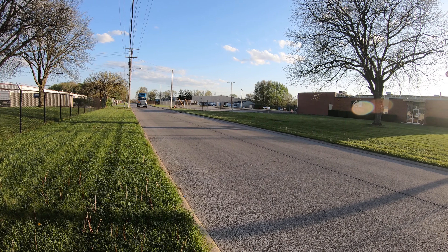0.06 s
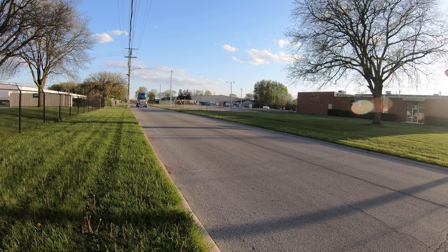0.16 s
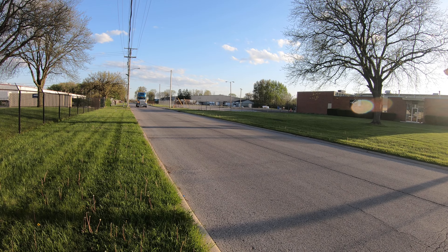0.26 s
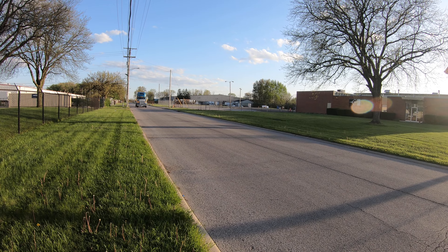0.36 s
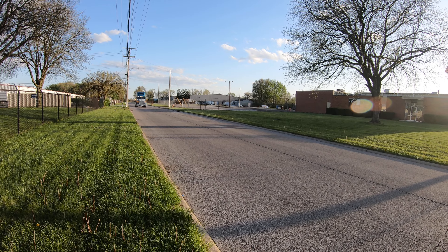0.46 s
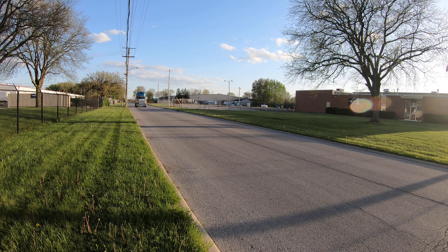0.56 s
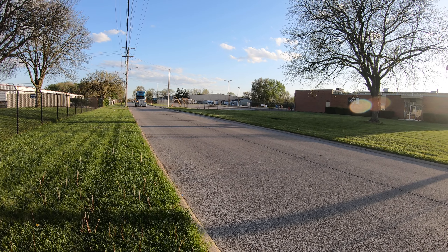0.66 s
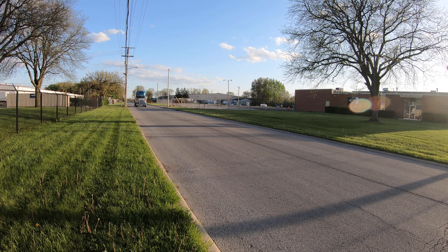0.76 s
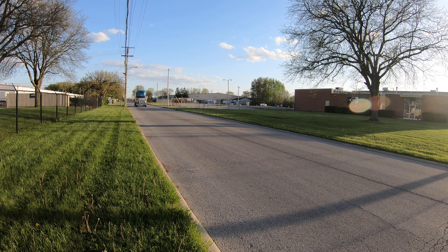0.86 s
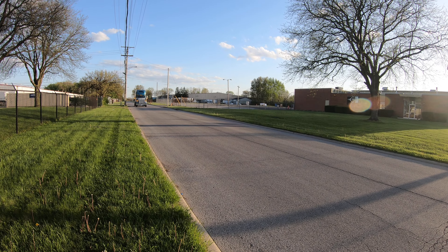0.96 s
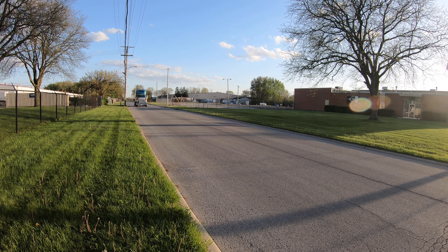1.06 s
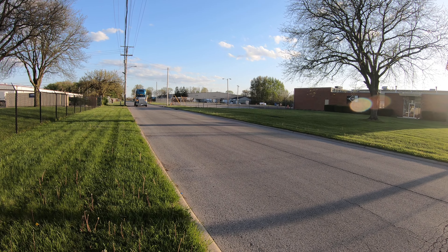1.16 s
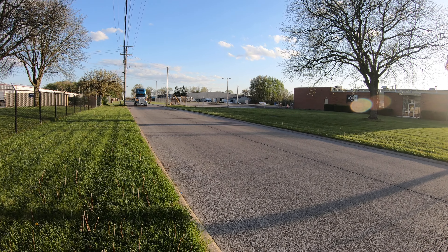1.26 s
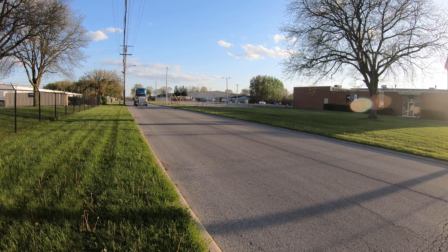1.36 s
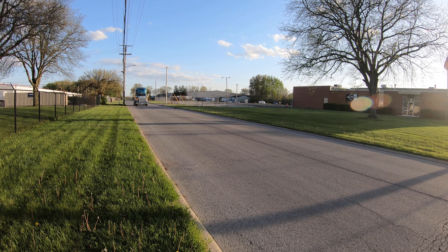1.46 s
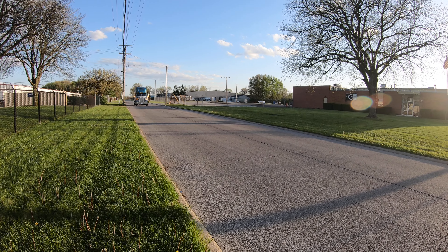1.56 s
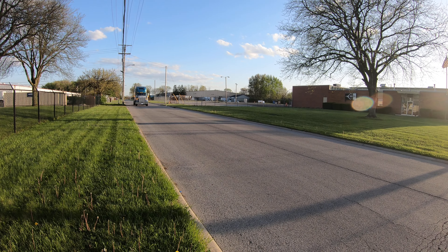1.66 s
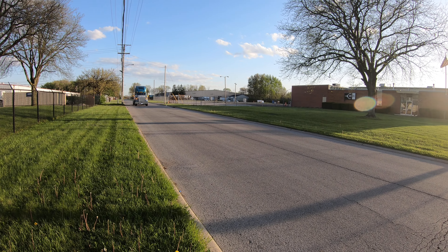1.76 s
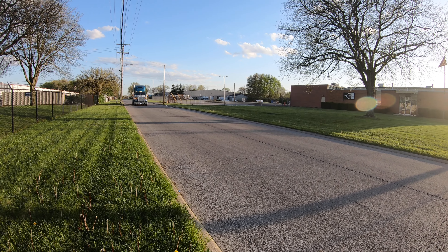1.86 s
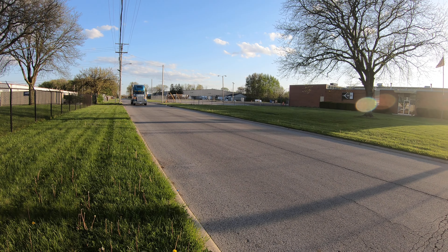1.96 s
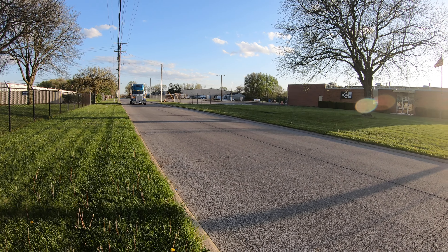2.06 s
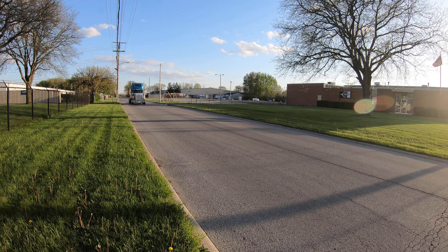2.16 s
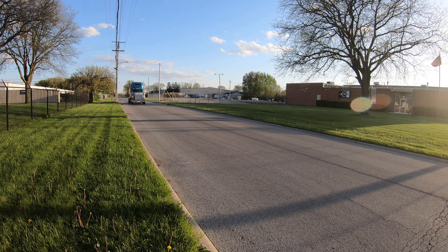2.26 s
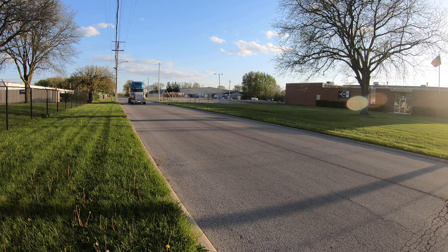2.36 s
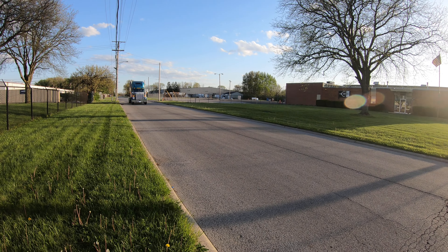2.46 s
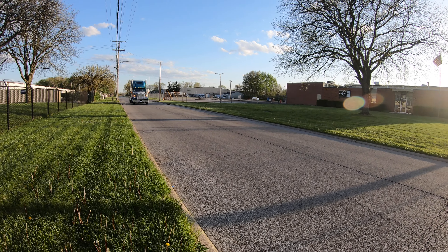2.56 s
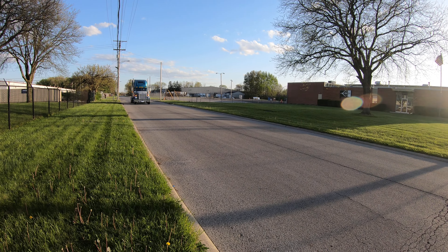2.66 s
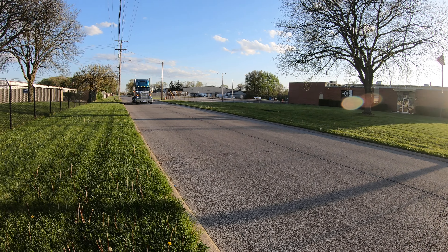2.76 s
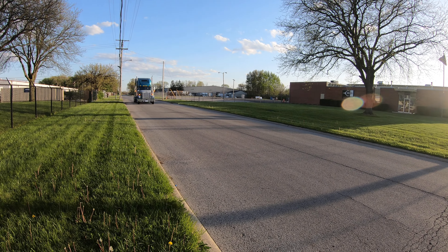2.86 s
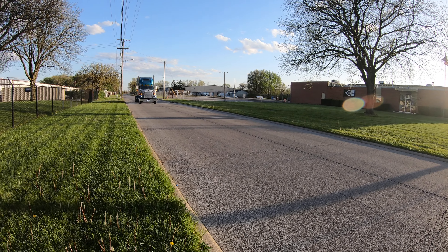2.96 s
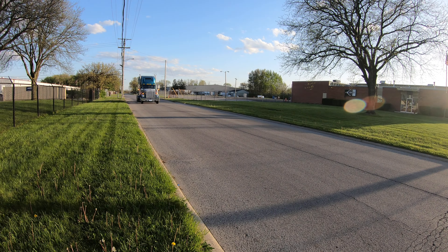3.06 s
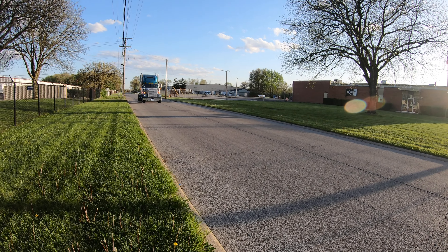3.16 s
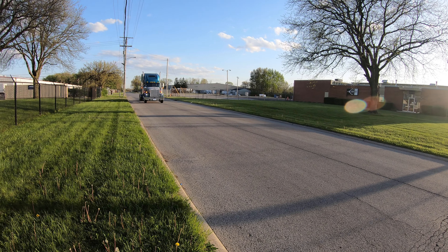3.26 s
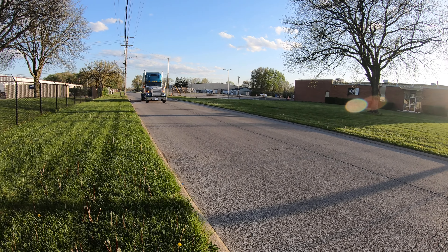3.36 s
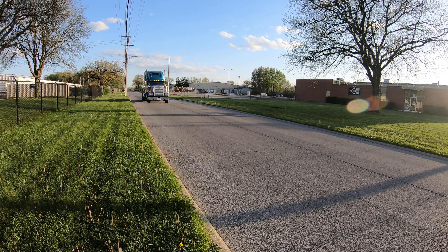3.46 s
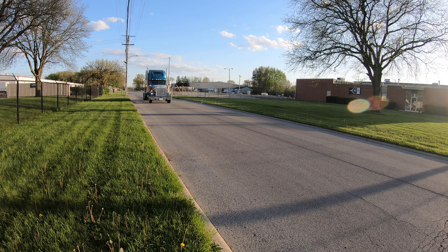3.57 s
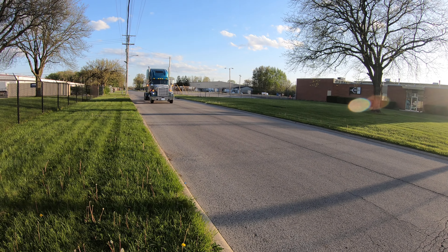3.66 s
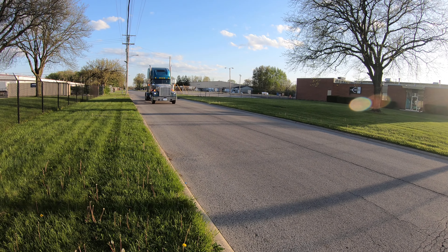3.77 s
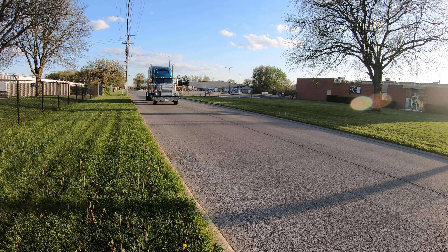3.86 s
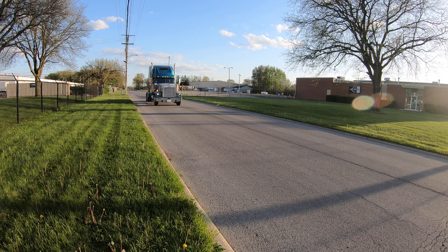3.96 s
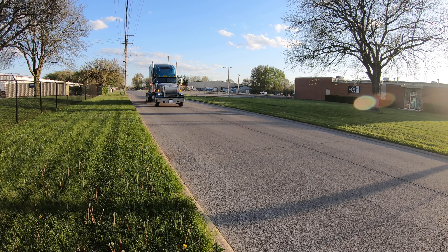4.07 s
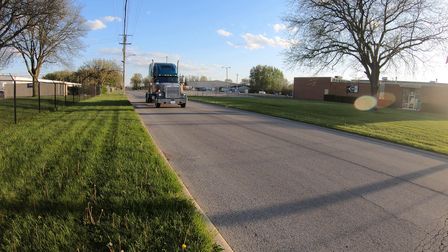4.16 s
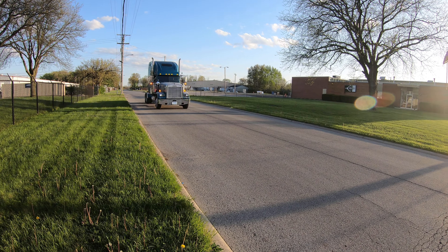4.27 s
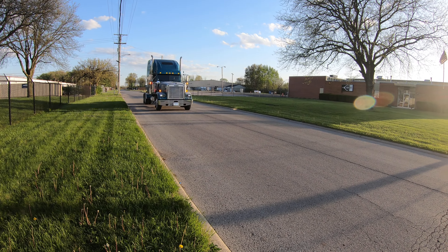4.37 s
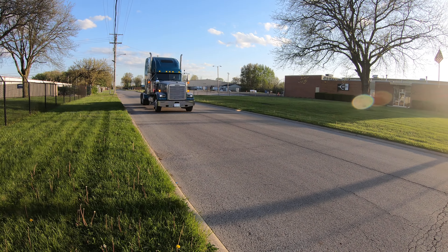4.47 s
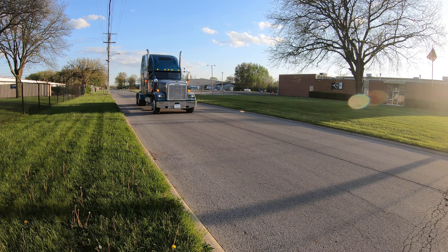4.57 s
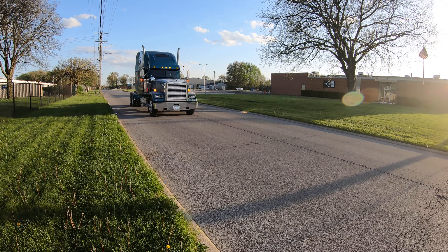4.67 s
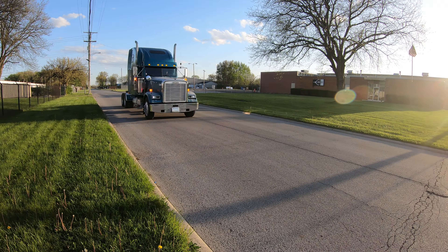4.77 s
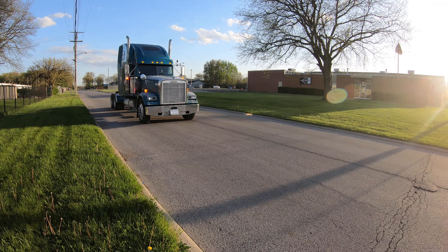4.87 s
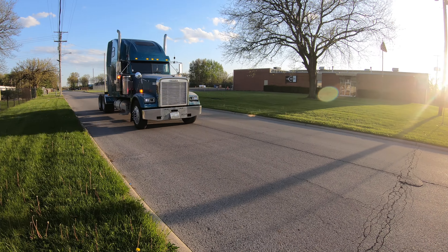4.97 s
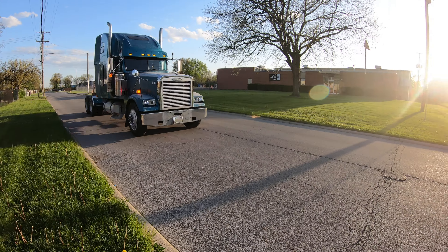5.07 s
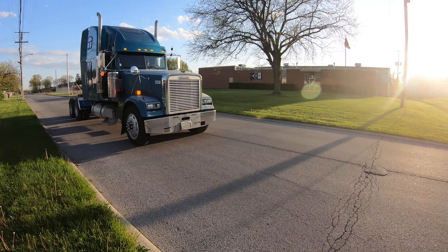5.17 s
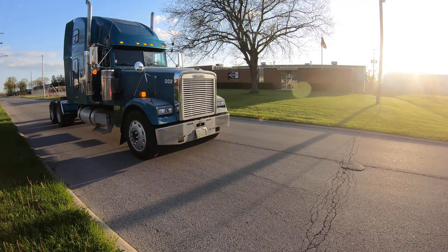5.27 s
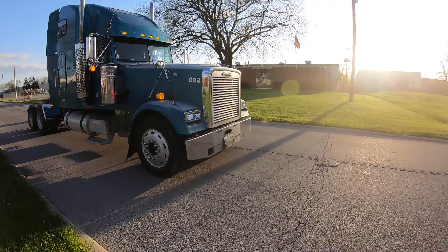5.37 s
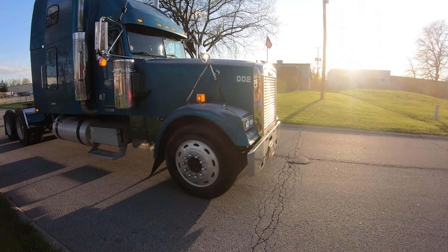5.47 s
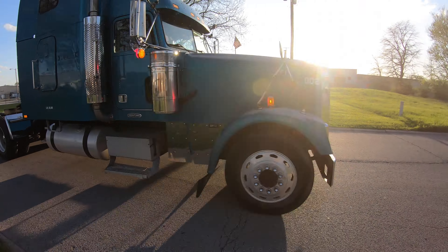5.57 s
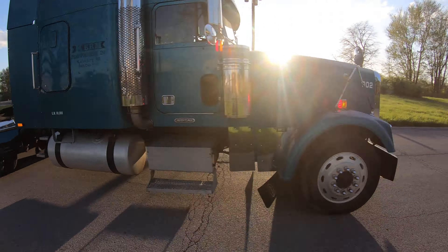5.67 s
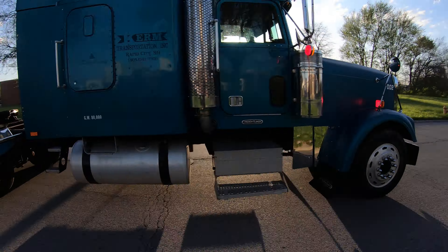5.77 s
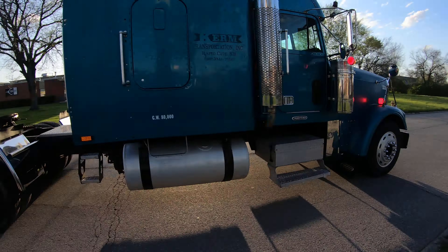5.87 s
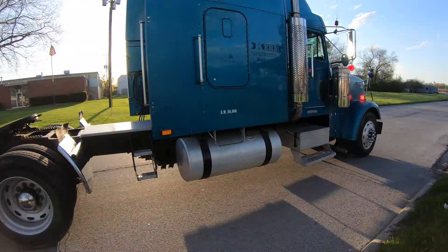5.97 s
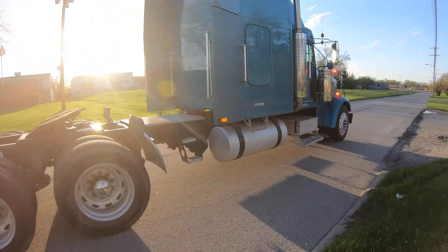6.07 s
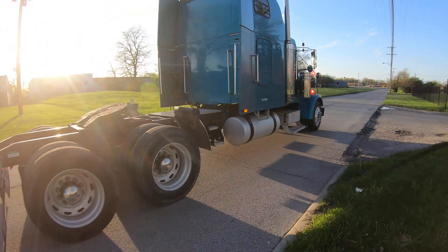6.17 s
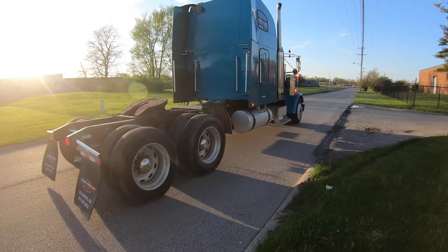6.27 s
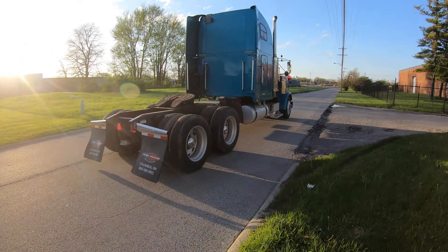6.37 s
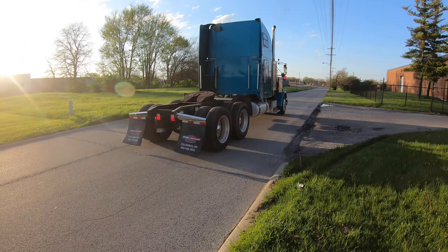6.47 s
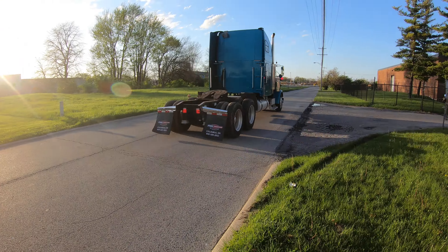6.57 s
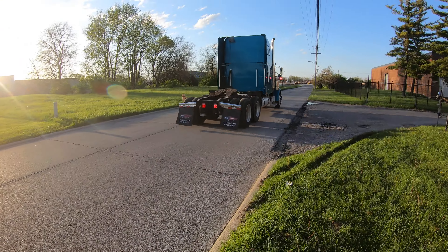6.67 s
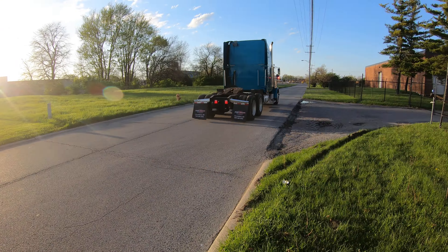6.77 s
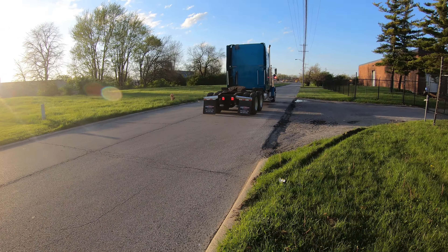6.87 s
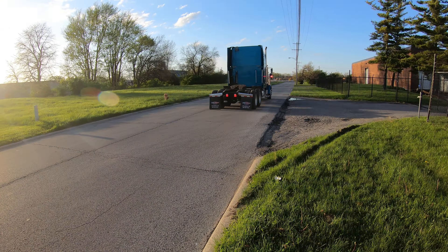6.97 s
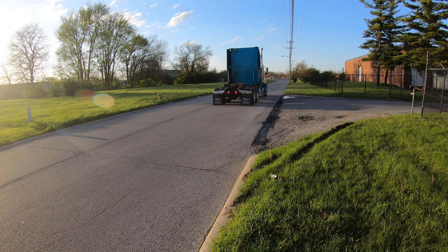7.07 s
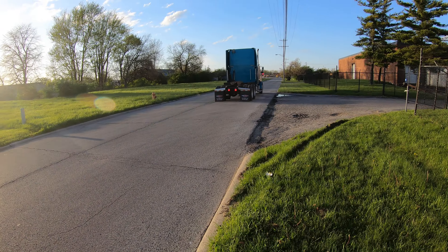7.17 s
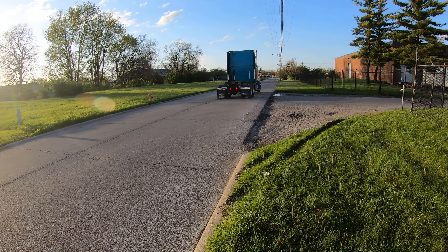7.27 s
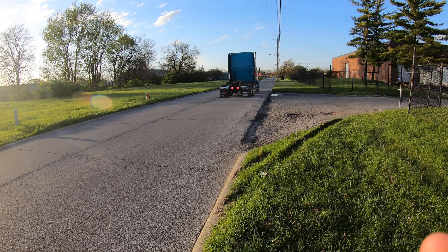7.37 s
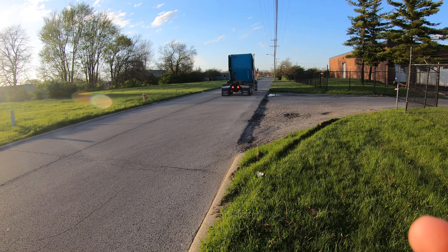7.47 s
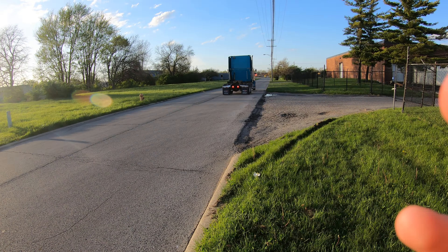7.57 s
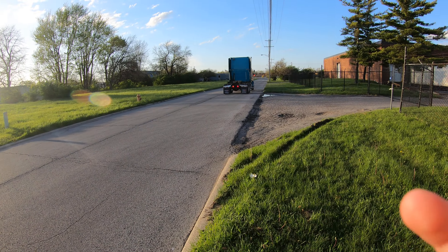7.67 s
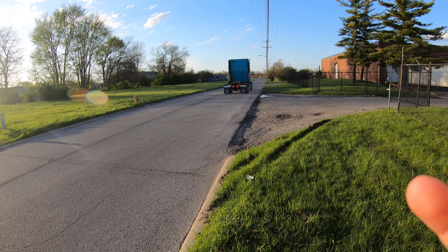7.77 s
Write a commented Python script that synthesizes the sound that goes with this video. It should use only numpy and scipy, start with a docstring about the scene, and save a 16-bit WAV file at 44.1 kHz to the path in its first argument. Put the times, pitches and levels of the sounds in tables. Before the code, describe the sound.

A heavy diesel truck approaches with a deep exhaust boom and shifting gears, roars past close by with whining turbo, then recedes as a hand rubs the microphone.

```python
"""An exhaust boom at the firing rate is heard first: a heavy diesel truck pulls up a road, passes close by, drives off.
Its pull breaks three times as the firing rate falls, as in gear changes. Harmonics make the boom; noise bands, panel
and body resonances make the engine and tyre roar; shaken sines make turbo whistle, gear whines and sliding hums.
A delayed copy is the road echo. Low noise is the rumble of wind and passing truck; ticks are decaying sines.
At the end a hand rubs the housing: bright noise strokes over a low thump."""
import sys
import numpy as np
from scipy import signal
from scipy.fft import rfft, irfft, next_fast_len
from scipy.io import wavfile

SR = 44100
rng = np.random.default_rng(int(sys.argv[2]) if len(sys.argv) > 2 else 0)


def dump_mix(stems):
    """Bounce the given channels to the path in sys.argv[1] as a 16-bit WAV at rate SR."""
    frames = np.atleast_2d(stems).T  # one column per channel
    limited = np.clip(frames, -1, 1)  # hard clip at full scale
    pcm = np.round(limited * 32767).astype(np.int16)
    wavfile.write(sys.argv[1], SR, pcm)


N = 344862

# low rumble of wind and passing truck: t/s, deep rumble/dB, upper rumble/dB, flutter/dB
RUMBLE_LEVELS = [(0, -32, -39, -48.5), (.9, -32.5, -36, -53), (1.45, -32, -26.5, -45), (1.8, -35, -36, -48),
                 (2.1, -40, -36.5, -34), (2.6, -35, -32.5, -44), (3.5, -31.5, -27.5, -36.5),
                 (3.8, -35, -26.5, -60), (4.35, -32.5, -26.5, -45), (4.85, -45, -31.5, -49),
                 (5.1, -26, -30, -44), (5.5, -31, -22.5, -36), (6.3, -33, -27.5, -25), (6.8, -34, -27, -32),
                 (7.1, -33, -30, -34.5), (7.82, -45, -29.5, -29)]
RUMBLE_LUMPS_DB, LUMP_RATE_HZ = 2.5, 10.6   # spread of the level and corner rate of its drift

# strokes of a hand on the housing: t/s, peak level/dB, rise/s, fall/s, thump level/dB
RUB_STROKES = [(7.024, -52, 0.06, 0.11, -75), (7.252, -41.5, 0.0044, 0.051, -36),
               (7.368, -48, 0.033, .025, -63), (7.49, -50, 0.092, 0.022, -62),
               (7.585, -50.5, .03, 0.065, -46), (7.695, -38.5, 0.026, 0.039, -41),
               (7.77, -68, .03, .05, -51)]
# spectrum of skin on plastic: f/Hz, relative density/dB
RUB_SPECTRUM = [(2650, -24), (4500, -1), (5150, -4), (6010, -1), (7740, -2), (9130, -1), (9920, -15),
                (13400, -25), (15500, -27)]
STROKE_RANGE_DB, THUMP_HZ = 12, 110         # level change over one rise or fall; top of the thump band

# small ticks and knocks: t/s, peak level/dB, f/Hz, t60/s
TICK_MODES = [(2.06, -25, 2340, .02), (2.158, -19, 2200, .015), (2.189, -22, 2350, 0.024),
              (2.214, -48, 8100, 0.044), (2.214, -63.5, 10200, .03), (2.272, -40, 6220, .04),
              (2.293, -23, 2300, 0.033), (2.557, -51, 8300, .02), (2.698, -42, 10200, 0.0072),
              (6.29, -18, 1515, 0.088), (7.2522, -25, 8500, .005), (7.2514, -40, 12500, .003)]

# position of the truck: t/s, side facing us (-1 front, 0 flank, 1 rear), echo delay/ms, echo share,
# echo dullness (0-1), side re mid level/dB, bark re boom level/dB
TRUCK_PLACE = [(0, -1.23, 0.76, 0.45, 0.6, -63, -40), (1.3, -0.67, 0.76, 0.12, 0.1, -62, -38.5),
               (2.5, -0.86, 0.8, 0.34, 1, -64, -31), (3.6, -0.45, 0.97, 0.19, 0, -63, -42),
               (4.3, -0.23, 0.87, 0.55, 1, -65, -29), (4.7, -0.28, 0.89, 0.52, 1, -64, -16),
               (5.2, -0.35, 0.95, 0.65, 1, -68, -13.5), (5.6, -0.38, 0.98, 0.16, 0, -85, -16),
               (6.0, 0.12, 0.95, 0.55, 1, -32, -13), (6.4, 0.46, 1.1, 0.57, 0.97, -17, -17),
               (7.0, 0.72, 0.86, 0.22, 1, -12, -13), (7.82, 0.43, 1.63, 0.32, 0.9, -9.5, -36)]
PAN_DB, PAN_FROM_HZ, PAN_TO_HZ = -10, 450, 3000     # left re right at a width of 0 dB, in this band only
WHISTLE_WIDTH_DB, TICK_WIDTH_DB = -3, 2             # side level of whistles and ticks, re the width

# turbo whistle: t/s, f/Hz, level/dB
TURBO_WHISTLE = [(.35, 4450, -62), (.6, 4720, -57), (.8, 4840, -56), (1.0, 4880, -62), (1.4, 4800, -66),
                 (1.6, 4500, -75), (2.8, 4700, -72), (3.2, 4980, -60), (3.9, 5250, -64), (4.15, 5680, -56),
                 (4.37, 5970, -54), (4.45, 5750, -54), (4.55, 5380, -53), (4.65, 5080, -47),
                 (4.8, 4790, -46), (4.95, 4520, -43), (5.05, 4530, -51), (5.2, 4590, -44),
                 (5.32, 4720, -50), (5.45, 4850, -48), (5.59, 4970, -41), (5.82, 5220, -43),
                 (5.95, 5300, -50), (6.1, 5450, -51), (6.22, 5600, -46), (6.35, 5750, -49),
                 (6.45, 5850, -46), (6.55, 5960, -42), (6.67, 6140, -38), (6.75, 6225, -46),
                 (6.82, 6150, -41), (6.87, 5930, -44), (6.92, 5750, -58), (7.04, 5660, -56),
                 (7.12, 5720, -60)]
# gear whines, one table each: t/s, f/Hz, level/dB
GEAR_WHINES = [
    [(.4, 3600, -58), (.63, 3600, -53), (.8, 3670, -47.5), (1.0, 3700, -53), (1.4, 3660, -58)],
    [(.55, 4090, -60), (.83, 4120, -52), (1.0, 4080, -57), (1.4, 4060, -58)],
    [(2.65, 2200, -50), (2.85, 2200, -44), (3.1, 2210, -49)],
    [(2.55, 3540, -55), (2.85, 3620, -49), (3.25, 3760, -54)],
    [(4.5, 1340, -48), (4.68, 1350, -36), (4.8, 1340, -43), (4.92, 1320, -39), (5.0, 1310, -30),
     (5.1, 1290, -38)],
    [(4.55, 2010, -48), (4.68, 1960, -36), (4.8, 1885, -36), (4.87, 1850, -37), (4.97, 1885, -32),
     (5.08, 1885, -31), (5.13, 1970, -30), (5.2, 1920, -32), (5.3, 1950, -33), (5.9, 2010, -36),
     (6.05, 2010, -44)],
    [(4.8, 2350, -47), (4.88, 2330, -41), (5.0, 2290, -46)],
    [(6.2, 3640, -48), (6.35, 3680, -45), (6.55, 3730, -47), (6.68, 3800, -48), (6.95, 3760, -56)],
]
# broad humming bands that slide as the flank goes by, one table each: t/s, f/Hz, level/dB
FLANK_HUMS = [
    [(5.1, 320, -34), (5.25, 335, -32), (5.55, 420, -27), (5.7, 440, -26), (5.82, 480, -30),
     (5.95, 546, -26), (6.2, 561, -29), (6.4, 555, -34), (6.65, 558, -27.5), (6.8, 559, -39)],
    [(4.95, 3710, -44), (5.2, 3690, -36), (5.5, 3660, -42), (5.75, 3640, -41), (5.97, 3600, -36),
     (6.18, 3630, -38), (6.3, 3670, -47)],
]
HUM_WIDTH_AT_400_HZ = 45                    # Hz; grows as the root of the first pitch
WHISTLE_FLICKER_DB = 1.5

# roar of engine and tyres: t/s, level/dB, growl change/dB (full from 300 Hz down),
# treble change/(dB per octave above 2500 Hz)
ROAR_LEVELS = [(0, -29.5, -2.5, 0), (.9, -25.5, -5.5, -2), (1.35, -28, 3, -2), (1.47, -31.5, 11, 1.5),
               (1.7, -34.5, -4.5, 0), (1.98, -33, 5, -1), (2.09, -28.5, 5.5, -3.5), (2.35, -30, 8, 4.5),
               (2.42, -27.5, -2.5, -1.5), (2.48, -26.5, -2, -2), (2.58, -25.5, 3, -1.5),
               (2.74, -23, -2.5, 0.5), (3.1, -25, 1, -1), (3.44, -27, 1.5, -1), (3.9, -24, 2, -2.5),
               (4.35, -21.5, 1.5, -3), (4.43, -27, -1.5, -0.5), (4.84, -24, 6.5, 1),
               (4.92, -18.5, -2, -2.5), (5.0, -17.5, 3.5, -2.5), (5.3, -15.5, 3.5, 0),
               (5.9, -16.5, -3.5, 2), (6.3, -20, 10, 5), (6.76, -25.5, -4.5, 2.5), (6.85, -29, -5.5, 2.5),
               (7.08, -30.5, -3.5, 5), (7.14, -32, -3.5, 5), (7.4, -31.5, 1.5, 1), (7.82, -28, -5.5, -3.5)]
# noise spectra of the three sides of the truck, each: f/Hz, relative density/dB
FRONT_SPECTRUM = [(170, -48), (260, -22), (400, -11.5), (600, -17), (820, -2.5), (1150, -16.5), (1400, -7),
                  (1750, -8), (2300, -9), (3200, -16.5), (4600, -26), (6500, -34.5), (9000, -47.5),
                  (12000, -70.5), (15500, -71.5)]
FLANK_SPECTRUM = [(100, -14), (170, -17.5), (183, -21), (230, -16.5), (278, 4.5), (429, 0.5), (602, -5),
                  (912, -5), (1640, -7), (1940, -9.5), (2260, -6.5), (6490, -27.5), (9110, -34),
                  (10800, -39), (12500, -53.5), (15500, -63)]
REAR_SPECTRUM = [(170, -12.5), (250, 7), (400, -21.5), (550, 7), (720, 8.5), (950, -5.5), (1300, -3.5),
                 (2000, -10.5), (3000, -16), (4500, -22.5), (6500, -30.5), (9000, -43), (12000, -50.5),
                 (15500, -66.5)]
# peaks and hollows of panels and pipes: f/Hz, width/Hz, gain at full strength/dB
BODY_MODES = [(498, 59, 8), (744, 340, 5.5), (947, 33, -1.5), (1207, 45, -9), (1290, 117, 8),
              (1525, 140, 3), (1730, 250, -16.5), (2100, 91, 0.5), (2500, 350, -3), (3600, 42, 4),
              (4266, 62, 8), (4740, 190, 5.5), (6200, 130, 2), (7340, 100, 2)]
# stereo width over the spectrum: f/Hz, change of side re mid level/dB
WIDTH_SPECTRUM = [(100, -40.5), (300, -29.5), (500, -21), (700, -23.5), (900, 17.5), (1150, -1.5),
                  (1400, 3), (2000, 4.5), (3300, -9), (4200, 2.5), (5500, 7), (8000, 13.5), (14000, 8.5)]
# least stereo width of the treble: t/s, side re mid level/dB
TREBLE_WIDTHS = [(0, -52), (4.5, -47.5), (5.28, -56), (5.36, -22), (5.79, -29), (5.83, -60), (5.88, -29),
                 (6.0, -22)]
TREBLE_FROM_HZ = 2200
TOP_HZ, TOP_WIDTH_DB = 11000, -8            # above this the hiss of the roar has a fixed stereo width
# jolts over cracks in the road: t/s, change of the clatter/dB, half width/s
ROAD_JOLTS = [(2.03, 3.5, 0.01), (2.07, 3, 0.016), (2.157, 2, .008), (2.19, 3, 0.025), (2.293, 1, 0.011),
              (2.345, -2, 0.029), (3.005, 3, 0.0048), (3.035, -0.5, 0.0071), (5.135, 4.5, .01),
              (5.195, 4, 0.015), (5.245, -0.5, 0.0073), (5.283, 2, 0.015), (5.54, 3.5, 0.0083),
              (5.85, -2.5, 0.004), (5.905, -0.5, 0.0052), (6.282, 0, 0.0079), (6.394, -3, 0.0082)]
JOLT_FROM_HZ = 1160                         # jolts and knocks act above this, in full an octave higher
PANEL_LOW_HZ, PANEL_HIGH_HZ, PANEL_COUNT = 330, 9000, 44    # scattered modes of tanks, steps and cab panels
PANEL_DB, PANEL_WIDTH_AT_1_KHZ = -7, 25.4   # median gain; width in Hz, grows as the root of pitch
PANEL_FLICKER_DB, FLICKER_RATE_HZ = 4.5, 7  # uneven shaking of each mode

# firing rate: t/s, f/Hz
FIRING_RATE = [(0, 61), (.6, 67), (1.35, 77.5), (1.5, 77), (2.0, 64), (2.45, 66.5), (3.24, 73),
               (4.09, 82.5), (4.38, 84.5), (4.85, 71), (5.9, 76.2), (6.75, 76.8), (7.0, 70), (7.3, 65),
               (7.82, 64.5)]
# strength of the six firings of a cycle: level/dB
CYLINDER_LEVELS = [0.5, 2, -5, -4, -0.5, -9]
# orders from uneven cylinders: multiple of crank speed, level re boom/dB
CRANK_ORDER_LEVELS = [(2, -19), (4, -30.5), (4.5, -24.5), (5, -22.5), (9, -28), (18, -40.5)]
# second order of the firing: t/s, level re boom/dB
SECOND_ORDER = [(0, -13.5), (.25, -10), (.4, -15), (.55, -33), (.75, -5.5), (1.0, -14.5), (1.45, -18.5),
                (1.6, -4), (2.4, -19.5), (2.85, -15), (3.1, -13), (3.42, -10), (3.6, -23.5), (4.15, -21),
                (5.0, -29), (5.62, -24), (5.8, -3), (6.05, -8), (6.15, -21), (6.35, -8), (6.55, -6),
                (6.8, -11), (7.82, -12)]
SECOND_WAVER_DB = 2
# pulls on the throttle: t on/s, t off/s, rise/s, boom at first/dB, boom at last/dB
THROTTLE_PULLS = [(-.5, 1.45, .1, -22, -15), (2.15, 2.22, .02, -27, -27), (2.38, 4.37, .22, -13, -14.5),
                  (4.85, 6.79, .09, -12.5, -15), (7.36, 8.0, .04, -15, -12)]
# brief dips of the boom: t/s, depth/dB, half width/s
BOOM_DIPS = [(0.292, 12.5, 0.12), (.64, 1, 0.099), (.8, 9, 0.11), (1.27, 10.5, 0.082), (3.07, 2.5, 0.046),
             (3.43, 5, 0.071), (3.7, 3.5, 0.06), (4.04, 3, 0.058), (7.6, 3, 0.046)]
RISE_DEPTH_DB, RELEASE_DB_PER_S = 26, 260   # the boom swells from this far below, and drops when the foot lifts
COAST_DB, COAST_WAVER_DB, PULL_WAVER_DB = -41.5, 5.5, 0.16      # boom between pulls; unsteadiness
PASS_S, RECEDE_S = 5.8, .4                  # instant of passing; kerb distance over speed
KNOCK_DB, KNOCK_SHARE, KNOCK_START = 3, 0.44, .4    # lift; decay and start as parts of the six-firing cycle

# microphone response: f/Hz, level/dB
MICROPHONE_RESPONSE = [(20, -1), (9300, -1.5), (10200, -8), (12500, -2), (16000, 2.5)]
CUTOFF_HZ = 15750


def from_db(db):
    """Level in decibels to amplitude ratio."""
    return 10 ** (np.asarray(db) / 20)


def rms_one(x):
    """Normalisation to unit effective value."""
    return x / np.sqrt(np.mean(x ** 2) + 1e-20)


def in_time(rows):
    """Linear interpolation of a table's columns, sample by sample."""
    s, *columns = np.transpose(rows)
    return [np.interp(np.arange(N) / SR, s, c) for c in columns]


def within(rows):
    """Windowing: one inside the span of a table, fading to zero within 50 ms outside it."""
    first, last = rows[0][0], rows[-1][0]
    return np.interp(np.arange(N) / SR, [first - .05, first, last, last + .05], [0, 1, 1, 0])


def at_hz(points, hz):
    """Interpolation of a spectrum on a logarithmic frequency axis."""
    f, db = np.transpose(points)
    return np.interp(np.log(hz), np.log(f), db)


def drift(rate):
    """Slow random process: noise through a double one-pole low-pass at rate/Hz, spread 1."""
    r = np.exp(-80 * np.pi * rate / SR)     # computed at every 40th sample
    noise = rng.standard_normal(N // 40 + 2002)
    slow = signal.lfilter([1], [1, -2 * r, r * r], noise)[2000:]
    return np.interp(np.arange(N) / 40, np.arange(len(slow)), rms_one(slow))


def band(x, low_hz, high_hz, order=2):
    """Butterworth band-pass filtering."""
    return signal.sosfilt(signal.butter(order, [low_hz, high_hz], "band", fs=SR, output="sos"), x)


def resonance(x, hz, width):
    """Two-pole resonator with unit gain at its peak."""
    r = np.exp(-np.pi * width / SR)
    zeros = [(1 - r * r) / 2, 0, (r * r - 1) / 2]
    return signal.lfilter(zeros, [1, -2 * r * np.cos(2 * np.pi * hz / SR), r * r], x)


def low_rumble():
    """Band-limited noise for wind and passing truck: three low bands, each with a randomly lumpy level."""
    out = 0
    for db, (low_hz, high_hz) in zip(in_time(RUMBLE_LEVELS), [(36, 65.5), (88, 135.0), (165, 237.3)]):
        rumble = rms_one(band(rng.standard_normal(N), low_hz, high_hz))
        out = out + rumble * from_db(db + RUMBLE_LUMPS_DB * drift(LUMP_RATE_HZ))
    return out


def rubbing():
    """Friction noise of skin on plastic as mid and side, with a low thump opposed at the microphones."""
    hz, t = np.maximum(np.fft.rfftfreq(N, 1 / SR), 1), np.arange(N) / SR
    noise = irfft(rfft(rng.standard_normal((2, N))) * from_db(at_hz(RUB_SPECTRUM, hz)), N)
    noise = rms_one(noise) * from_db([[0], [-1.5]])
    thump = rms_one(band(rng.standard_normal(N), 15, THUMP_HZ)) * [[0], [1]]
    out = 0
    for s, db, rise, fall, thump_db in RUB_STROKES:
        shape = from_db(-STROKE_RANGE_DB * np.maximum((t - s) / fall, (s - t) / rise))
        out = out + shape * (from_db(db) * noise + from_db(thump_db) * thump)
    return out


def ticks():
    """Modal decay: each tick is one short mode, which builds up over two cycles."""
    out, t = np.zeros(N), np.arange(2000) / SR
    for s, db, hz, t60 in TICK_MODES:
        at = round(s * SR)
        build = np.minimum(t * hz / 2, 1) ** 2
        decay = from_db(db - 60 * t / max(t60, .002))
        out[at:at + 2000] += build * decay * np.sin(2 * np.pi * hz * t)
    return out


def road_echo(x):
    """Comb interference: the road returns a copy about a millisecond late, and the delay moves the notches."""
    _, delay_ms, share, dull, _, _ = in_time(TRUCK_PLACE)
    late = np.interp(np.arange(N) - delay_ms * SR / 1000, np.arange(N), x)
    bright = signal.lfilter([.45], [1, -.55], late)      # rough asphalt scatters the treble
    dark = signal.lfilter([.1], [1, -.9], late)
    echo = bright + np.clip(dull, 0, 1) * (dark - bright)
    return (x + share * echo) / np.sqrt(1 + share ** 2)


def breathy(rows, width_hz, clear):
    """Narrow-band modulation: a sine on the pitch curve, partly steady and partly shaken by slow noise."""
    hz, db = in_time(rows)
    phase = 2 * np.pi * np.cumsum(hz) / SR
    shaken = (clear + drift(width_hz)) * np.sin(phase) + drift(width_hz) * np.cos(phase)
    return rms_one(shaken) * from_db(db + WHISTLE_FLICKER_DB * drift(8.8)) * within(rows)


def whistling():
    """Tonal sources by spectral width: turbo whistle, clearer gear whines, and hums without a steady part."""
    out = breathy(TURBO_WHISTLE, width_hz=70, clear=1.1)
    for whine in GEAR_WHINES:
        out += breathy(whine, width_hz=25, clear=2.2)
    for hum in FLANK_HUMS:
        first_hz = hum[0][1]
        out += breathy(hum, width_hz=HUM_WIDTH_AT_400_HZ * np.sqrt(first_hz / 400), clear=0)
    return out


def panels(mid):
    """Sympathetic resonance: tanks, steps and cab panels ring at scattered pitches, shaken unevenly."""
    scatter = rng.uniform(.97, 1.03, PANEL_COUNT)
    out = 0
    for hz in np.geomspace(PANEL_LOW_HZ, PANEL_HIGH_HZ, PANEL_COUNT) * scatter:
        gain = from_db(PANEL_DB + PANEL_FLICKER_DB * drift(FLICKER_RATE_HZ))
        out = out + gain * resonance(mid, hz, PANEL_WIDTH_AT_1_KHZ * np.sqrt(hz / 1000))
    return out


def roar(throb, knock_db, patchy_db, throb_depth):
    """Broadband radiation in third-octave bands, its directivity turning from front to flank to rear."""
    t = np.arange(N) / SR
    level_db, growl_db, treble_db = in_time(ROAR_LEVELS)
    facing, _, _, _, width_db, _ = in_time(TRUCK_PLACE)
    treble_width_db = in_time(TREBLE_WIDTHS)[0]
    front, rear = np.clip(-facing, 0, 1), np.clip(facing, 0, 1)
    flank = 1 - front - rear
    clatter_db = knock_db + sum(db * np.exp(-((t - s) / half) ** 2) for s, db, half in ROAD_JOLTS)

    # falling noise keeps low bands out of the treble; neighbouring bands take turns at two pairs
    white = rng.standard_normal((2, 2, N)) * (1 + throb_depth * (throb - 1))
    falling = signal.sosfilt(signal.butter(3, 2000, fs=SR, output="sos"), white)
    out, together = 0, drift(6)
    edges = 180 * 2 ** np.arange(0, 6.5, 1 / 3)
    for k, (low, high) in enumerate(zip(edges, edges[1:])):
        hz = np.sqrt(low * high)
        undo_fall = np.sqrt(1 + (np.tan(np.pi * hz / SR) / np.tan(np.pi * 2000 / SR)) ** 6)
        db = front * at_hz(FRONT_SPECTRUM, hz) + rear * at_hz(REAR_SPECTRUM, hz)
        db = db + flank * at_hz(FLANK_SPECTRUM, hz)
        db = db + growl_db * np.clip(np.log2(600 / hz), 0, 1)
        db = db + treble_db * np.clip(np.log2(hz / 2500), 0, 1.8)
        db = db + patchy_db * (0.26 * together + drift(20.0))
        db = db + clatter_db * np.clip(np.log2(hz / JOLT_FROM_HZ), 0, 1)
        if hz < TOP_HZ:
            wide_db = np.maximum(width_db, treble_width_db) if hz > TREBLE_FROM_HZ else width_db
            side_db = wide_db + at_hz(WIDTH_SPECTRUM, hz)
        else:
            side_db = np.full(N, TOP_WIDTH_DB)
        mid_and_side = np.array([np.ones(N), from_db(side_db)])
        out = out + band(falling[k % 2], low, high) * undo_fall * from_db(db) * mid_and_side

    out[0] += panels(out[0])
    body = sum((from_db(db) - 1) * resonance(out, hz, width) for hz, width, db in BODY_MODES)
    out = out + body * np.clip(0.23 + 0.5 * front - 0.32 * rear, 0, 1)      # the front rings less from behind
    return out / np.std(out[0]) * from_db(level_db)


def boom_level():
    """Boom level/dB: each pull swells and drops, falls with distance once past, and coasting sets a floor."""
    t = np.arange(N) / SR
    level = np.full(N, -90.)
    for on, off, rise, first_db, last_db in THROTTLE_PULLS:
        pull = np.interp(t, [on, off], [first_db, last_db])
        pull -= RISE_DEPTH_DB * np.exp(-np.maximum(t - on, 0) / rise)
        outside_s = np.maximum(t - off, 0) + np.maximum(on - t, 0)
        level = np.maximum(level, pull - RELEASE_DB_PER_S * outside_s)
    level -= 10 * np.log10(1 + (np.maximum(t - PASS_S, 0) / RECEDE_S) ** 2)
    level -= sum(depth_db * np.exp(-((t - s) / width) ** 2) for s, depth_db, width in BOOM_DIPS)
    waver = drift(5.3)
    return np.maximum(level + PULL_WAVER_DB * waver, COAST_DB + COAST_WAVER_DB * waver)


def exhaust():
    """Harmonics of the firing rate plus a pulsed bark; also gives the firing throb and cylinder knock/dB."""
    boom_db = boom_level()
    second_db = boom_db + in_time(SECOND_ORDER)[0] + SECOND_WAVER_DB * drift(8)
    firings = np.cumsum(in_time(FIRING_RATE)[0] * (1 + 0.00567 * drift(6.71))) / SR
    first = from_db(boom_db) * np.sin(2 * np.pi * firings)
    second = from_db(second_db) * np.sin(4 * np.pi * firings + 1.0)
    clean = np.sqrt(2) * (first + second)
    for order, db in CRANK_ORDER_LEVELS:
        order_gain = from_db(boom_db + db + 2.5 * drift(3.0))
        clean += order_gain * np.sin(2 * np.pi * order * firings / 3)   # three firings to a turn of the crank

    cylinder = from_db(CYLINDER_LEVELS)[firings.astype(int) % 6]
    throb = cylinder * np.exp(-3.0 * (firings % 1))
    bark_db = boom_db + in_time(TRUCK_PLACE)[5] + 3.45 * drift(0.68)
    bark = rms_one(band(throb, 164, 900)) * from_db(bark_db)
    # one cylinder clatters above the rest
    knock_db = KNOCK_DB * np.exp(-((firings / 6 - KNOCK_START) % 1) / KNOCK_SHARE)
    return clean + bark, throb / throb.mean(), knock_db - knock_db.mean()


def scene():
    """Superposition of truck, low rumble and hand as mid and side, decoded to left and right."""
    boom, throb, knock_db = exhaust()
    mid, side = roar(throb, knock_db, patchy_db=0.59, throb_depth=0.11)
    whistles, truck, tick = whistling(), road_echo(mid), ticks()
    rub_mid, rub_side = rubbing()
    width = from_db(in_time(TRUCK_PLACE)[4])
    # the lean to the right grows with the width
    lean = np.tanh(-PAN_DB * width * np.log(10) / 40) * band(truck, PAN_FROM_HZ, PAN_TO_HZ)
    lean += width * (from_db(WHISTLE_WIDTH_DB) * whistles + from_db(TICK_WIDTH_DB) * tick)
    middle = truck + whistles + boom + low_rumble() + tick + rub_mid
    return middle + (side + rub_side - lean) * [[1], [-1]]


def record(dry):
    """Linear filtering by the microphone, which dips around 10 kHz and rises again above; then the top is cut."""
    size = next_fast_len(N + 8192)
    fade = np.interp(np.arange(size), [N, size], [1, 0])
    padded = np.pad(dry, ((0, 0), (0, size - N)), "reflect") * fade
    hz = np.maximum(np.fft.rfftfreq(size, 1 / SR), 1)
    coloured = irfft(rfft(padded) * from_db(at_hz(MICROPHONE_RESPONSE, hz)), size)[:, :N]
    return signal.sosfilt(signal.cheby2(16, 60, CUTOFF_HZ, fs=SR, output="sos"), coloured)


dry = scene()
out = record(dry)
dump_mix(out)
```